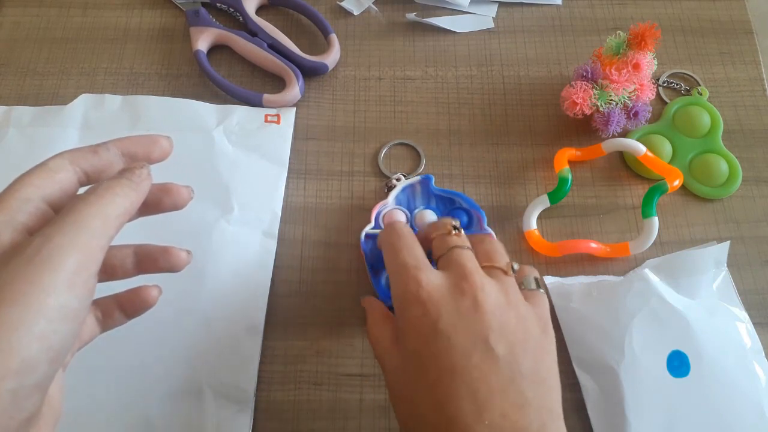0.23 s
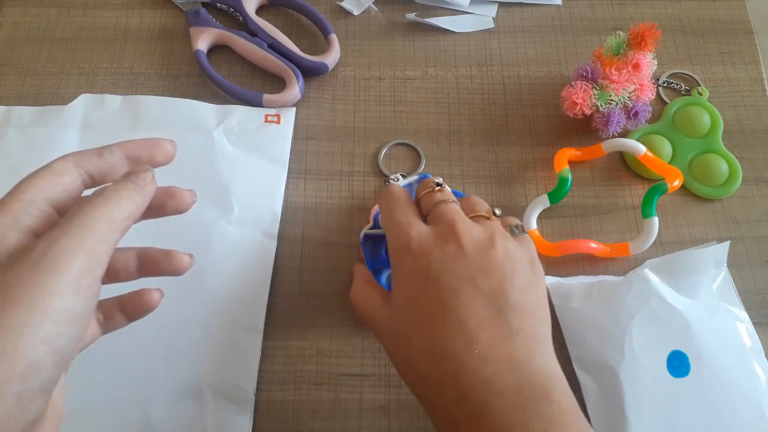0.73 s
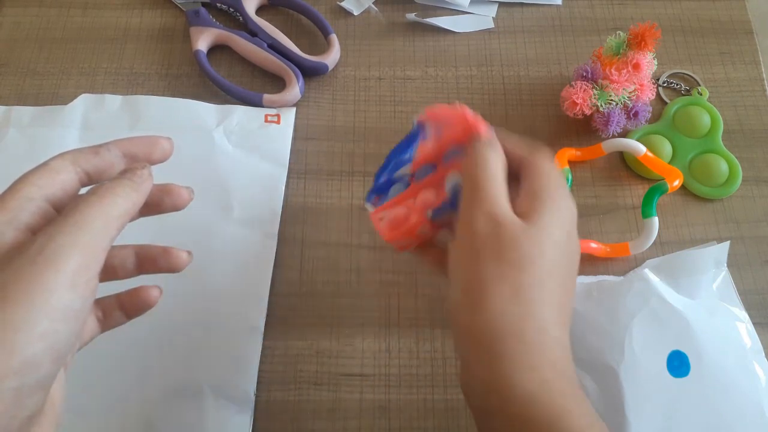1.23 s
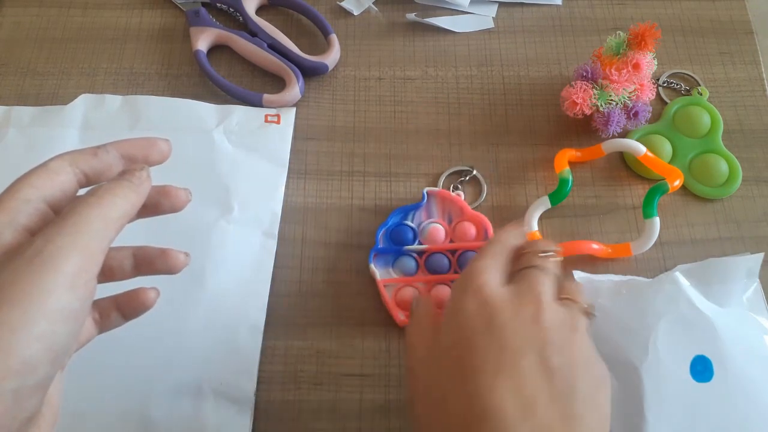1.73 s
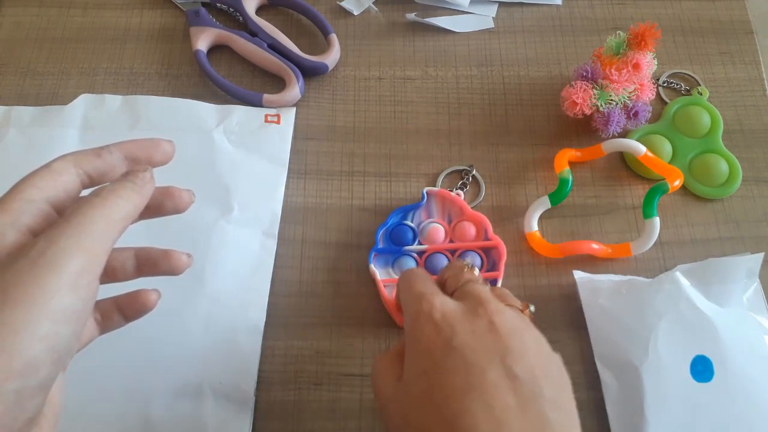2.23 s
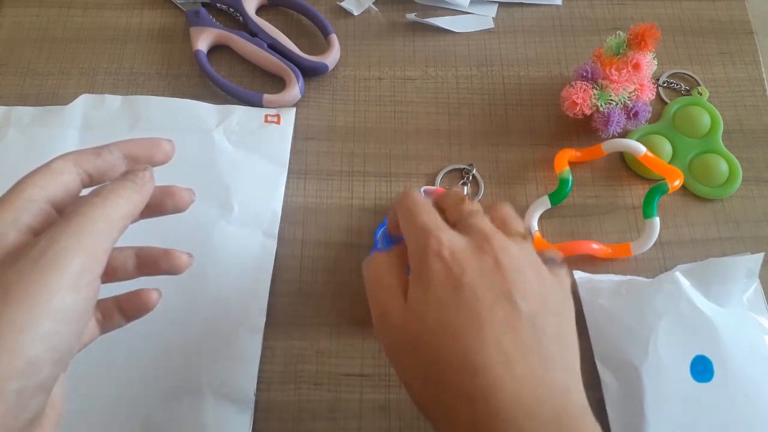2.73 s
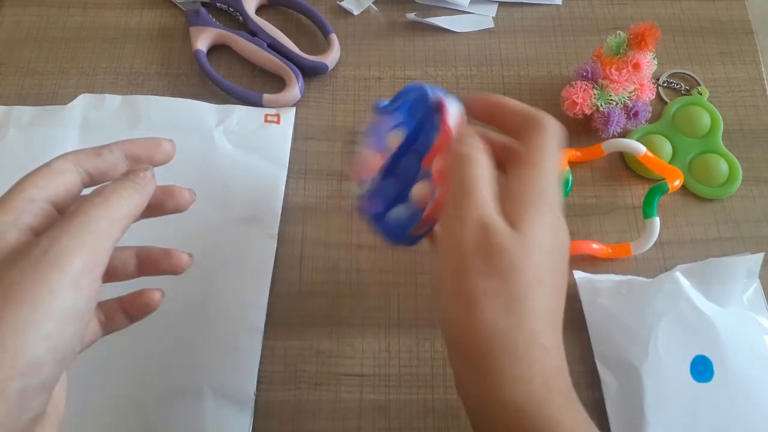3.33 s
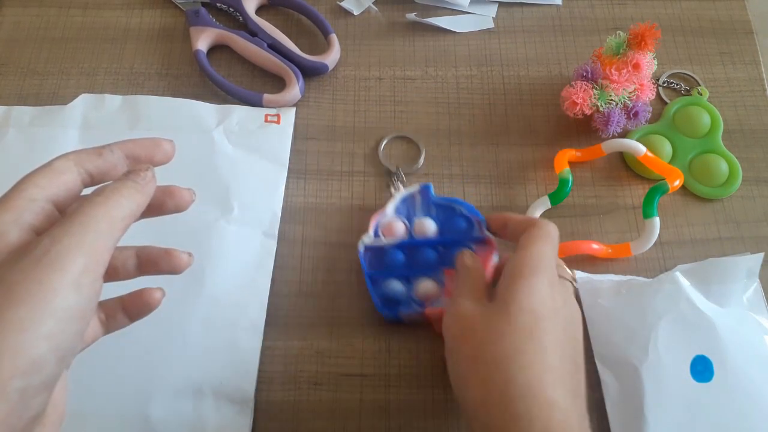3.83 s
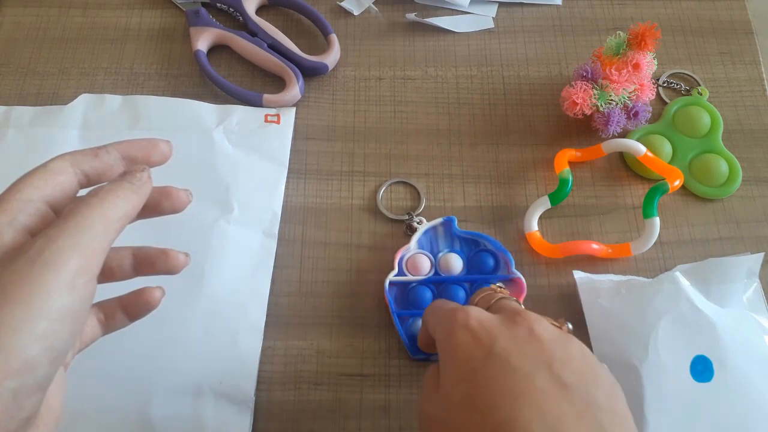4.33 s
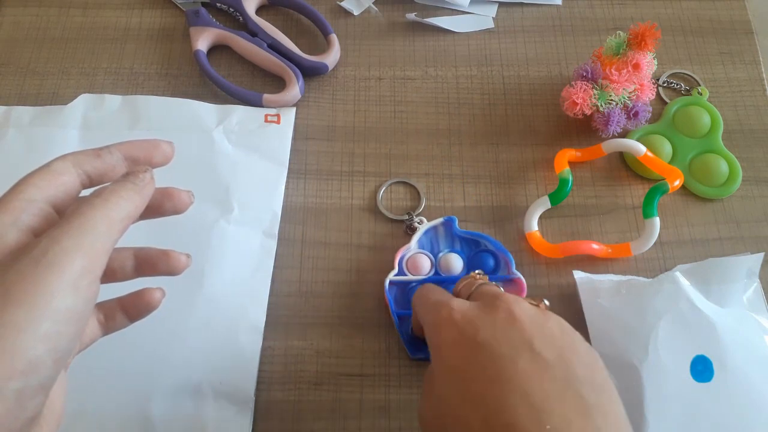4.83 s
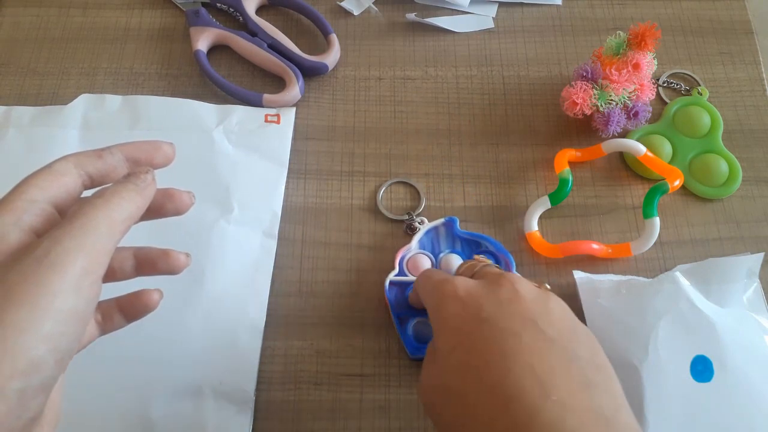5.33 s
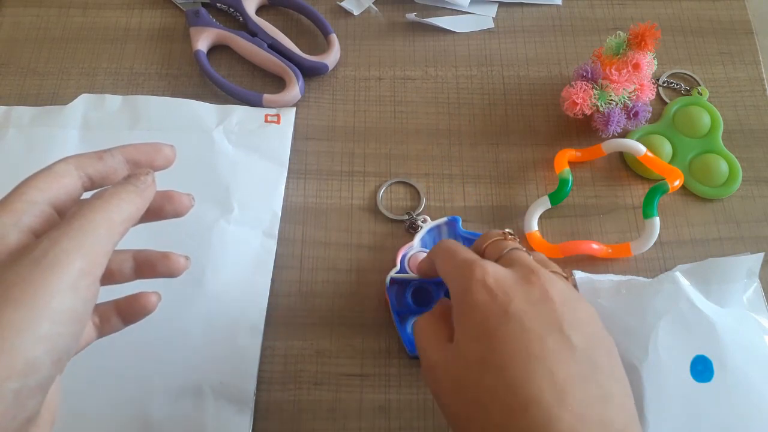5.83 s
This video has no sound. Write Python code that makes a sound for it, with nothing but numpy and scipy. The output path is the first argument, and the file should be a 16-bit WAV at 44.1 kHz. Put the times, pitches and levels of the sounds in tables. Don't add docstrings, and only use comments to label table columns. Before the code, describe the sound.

Close, punchy rubbery pops, metallic key-ring clatter as the toy is turned over, then a dragging rub with a brief squeak and more pops.

```python
import sys
import numpy as np
from scipy import signal
from scipy.fft import rfft, irfft
from scipy.io import wavfile

SR = 44100
rng = np.random.default_rng(int(sys.argv[2]) if len(sys.argv) > 2 else 0)


def file_out(sig):
    cols = np.atleast_2d(sig).T
    lim = np.clip(cols, -1, 1)
    pcm = np.round(lim * 32767).astype(np.int16)
    wavfile.write(sys.argv[1], SR, pcm)


def linear_from_db(decibels):
    return 10 ** (np.asarray(decibels, float) / 20)


N = 267775


def rms_one(x):
    return x / np.sqrt(np.mean(x ** 2) + 1e-20)


def peak_one(x):
    return x / (np.abs(x).max() + 1e-20)


def band(x, low_hz, high_hz):
    limits = [low_hz, min(high_hz, .45 * SR)]
    return signal.sosfilt(signal.butter(2, limits, "band", fs=SR, output="sos"), x)


def coloured(spectrum, size):
    hz, level_db = np.transpose(spectrum)
    bins = np.maximum(np.arange(size // 2 + 1) * SR / size, 1)
    gain = linear_from_db(np.interp(np.log(bins), np.log(hz), level_db))
    return rms_one(irfft(rfft(rng.standard_normal(size)) * gain, size))


def modes(clicks, table):
    out = 0
    for hz, level_db, t60 in table:
        r = linear_from_db(-60 / (t60 * SR))
        w = 2 * np.pi * hz / SR
        gain = linear_from_db(level_db) * np.sin(w)
        out = out + signal.lfilter([0, gain], [1, -2 * r * np.cos(w), r * r], clicks + 1e-18)
    return out


def burst(size, length):
    t = np.arange(size) / SR
    rise = np.minimum(t / max(.4 * length - .001, .0003), 1)
    return rise * np.exp(-(t / max(length, .0003)) ** 1.25)


def add(track, s, sound):
    i = round(s * SR)
    track[i:i + len(sound)] += sound[:N - i]


def pop_rows():
    # start in seconds, peak in dB, air cavity pitch in Hz,
    # rim crack in dB, ring length in cycles.
    snaps = [(0.692, -10.5, 598, -41.5, 1.17), (2.2995, -10.5, 895, -39.5, 2.4),
             (2.313, 8.5, 1320, -10.5, 1.36), (2.319, 7, 1126, -16.5, 1.8), (2.336, 3.5, 930, -10, 2.13),
             (2.61, 0.5, 937, -13.5, 1.27), (2.632, 0.5, 767, -12.5, 1.54), (2.638, 0.5, 1080, -10, 1.3),
             (2.881, 1, 1210, -26, 1.33), (2.889, 0.5, 2100, -16, 1.9), (2.909, -5, 1250, -13.5, 1.05),
             (4.115, -13.5, 1260, -22, 1.95), (4.116, -5, 910, -24, 1.4), (4.792, -6.5, 1000, -58, 1.22),
             (5.588, -5, 1944, -15, 1.34), (5.832, -3.5, 1443, -48, 2.28)]
    # start in seconds, peak in dB, air cavity pitch in Hz.
    ticks = [(0.232, -40.5, 2340), (0.294, -37, 4000), (0.534, -36.5, 1330), (0.65, -26, 750),
             (1.0, -27.5, 1880), (1.017, -36.5, 1850), (1.573, -20.5, 1500), (1.728, -22, 994),
             (1.955, -34, 1373), (2.015, -39, 1087), (2.6, -21, 803), (2.847, -27, 1510),
             (2.855, -23, 1130), (3.145, -20.5, 1510), (4.389, -44, 1020), (4.414, -37, 1150),
             (4.809, -14, 1015), (5.15, -18.5, 1550), (5.214, -27, 1300), (5.253, -38, 675),
             (5.773, -24, 1333), (5.782, -27, 1470), (5.903, -21.5, 1500), (6.001, -35.5, 1287)]
    crack_under_peak_db, cycles = -25, 1.3
    return sorted(snaps + [(s, db, hz, db + crack_under_peak_db, cycles) for s, db, hz in ticks])


def pops():
    crack_hz = 6350
    rows, out, t = pop_rows(), np.zeros(N), np.arange(600) / SR
    grit = rng.standard_normal((len(rows), 600))
    for (s, peak_db, hz, crack_db, cycles), noise in zip(rows, grit):
        turns = t * hz
        overtone_db = -1 - 13 * np.log2(hz / 1000) + 0.37 * (crack_db - peak_db)
        swell = turns ** 0.89 * np.exp(-(turns / cycles) ** 2)
        overtone = linear_from_db(overtone_db) * np.sin(2 * np.pi * 2.05 * turns)
        cavity = swell * (np.sin(2 * np.pi * turns) + overtone)
        click = (1 + .5 * noise) * burst(600, .0003) * np.cos(2 * np.pi * crack_hz * t)
        crack = band(click + .2 * noise * burst(600, .002), 2800, 11000)
        add(out, s + .0005, linear_from_db(peak_db - 2.0) * peak_one(cavity))
        add(out, s + 0.00064, linear_from_db(crack_db + 1.25) * peak_one(crack))
    return out


def squelches():
    # start in seconds, peak in dB, centre in Hz, length in seconds.
    squashed = [(0.439, -25.5, 810, 0.012), (0.446, -30, 1680, 0.018), (0.45, -44, 450, 0.022),
                (2.577, -16, 1490, 0.022), (2.582, -31, 980, 0.0081), (2.771, -24, 1380, 0.015),
                (2.849, -29, 1044, 0.017), (2.872, -18.5, 1978, 0.03), (3.107, -26, 864, 0.015),
                (3.208, -42.5, 664, 0.0071), (3.315, -34.5, 1620, 0.025), (3.46, -26, 754, 0.056),
                (4.117, -19, 606, 0.0098), (4.291, -33.5, 830, 0.018), (4.65, -43, 1350, 0.014),
                (4.997, -55, 1404, 0.015), (5.144, -28.5, 1602, 0.017), (5.153, -30.5, 447, 0.013),
                (5.602, -28.5, 1786, 0.031), (5.899, -36.5, 1565, 0.017)]
    width = 1.98
    out, grit = np.zeros(N), rng.standard_normal((len(squashed), 2, 8000))
    for (s, peak_db, hz, length), (noise, size) in zip(squashed, grit):
        slips = noise * linear_from_db(5.0 * size) * burst(8000, length)
        creases = band(slips, hz / width, hz * width)
        creases = band(creases, hz / width ** 2, hz * width ** 0.43)
        add(out, s, linear_from_db(peak_db) * peak_one(creases))
    return out


def landings():
    # start in seconds, peak in dB, centre in Hz, slap of the toy in dB.
    first_flip = [(1.0829, -40, 4900, -57.5), (1.1009, -28.5, 7000, -39.5), (1.1209, -27.5, 5070, -35.5),
                  (1.1286, -30.5, 2800, -51.5), (1.285, -5, 3250, -5.5), (1.3074, -18.5, 2700, -12),
                  (1.3641, 4, 5410, -3.5), (1.4134, -15, 5000, -11.5), (1.4252, -4, 4830, -7.5),
                  (1.5103, -26.5, 3180, -55), (1.6192, -42, 3550, -61), (1.6542, -24.5, 5476, -57),
                  (1.6601, -19, 5930, -23.5), (1.7424, -21.5, 3560, -22), (1.7639, -11, 5970, -9.5),
                  (1.7749, -10.5, 5910, -14), (1.7843, -13.5, 3420, -19.5)]
    # start in seconds, peak in dB, centre in Hz, slap of the toy in dB.
    second_flip = [(3.1076, -37.5, 5210, -40), (3.1204, -31.5, 3760, -26.5), (3.2615, -41, 3700, -43),
                   (3.2765, -46, 8160, -42), (3.2959, -34.5, 7600, -38.5), (3.3992, -17, 5460, -13.5),
                   (3.4391, -27, 8100, -20.5), (3.475, -24, 2360, -27), (3.484, -6, 3730, -8.5),
                   (3.5047, -9, 3470, -30), (3.5196, -7.5, 4870, -14), (3.5527, -7, 3280, -9.5),
                   (3.566, -15, 3230, -29), (3.5867, -24.5, 3100, -39)]
    # start in seconds, peak in dB, slap of the toy in dB.
    skips = [(3.6346, -18, -46), (3.6535, -13, -21), (3.6755, -25, -52.5), (3.6879, -15, -14.5),
             (3.695, -10, -21), (3.7286, -34, -49), (3.7549, -14, -20), (3.8074, -20, -61),
             (3.8571, -21.5, -41), (3.901, -15, -24), (3.9499, -23.5, -16), (3.9878, -22, -61),
             (3.9998, -31, -19), (4.0307, -18, -56), (4.0657, -25, -33), (4.1054, -19.5, -14.5),
             (4.1125, -46, -15), (4.1414, -16, -26), (4.151, -29, -27), (4.1698, -17.5, -20),
             (4.1834, -25.5, -24.5), (4.7212, -48.5, -63), (4.7992, -37, -33), (4.8063, -31, -29),
             (5.8214, -34.5, -34)]
    skip_hz = 3700
    top_per_db = 1.84
    flips = [(*row, top_per_db * row[1] - 26.5) for row in first_flip + second_flip]
    return flips + [(s, db, skip_hz, slap_db, top_per_db * db - 24) for s, db, slap_db in skips]


def clatter():
    # pitch in Hz, level in dB, time to die away in seconds.
    key_ring = [(8030, -8, .11), (8160, -11, .07), (7900, -13, .06)]
    # start in seconds, peak in dB.
    ring_hits = [
        (1.0992, -42.5),
        (1.2883, -27.5),
        (1.3105, -38),
        (3.2759, -43),
        (3.2959, -37),
        (3.401, -39.5),
        (3.4082, -29.5),
    ]
    spray_s, top_turned_db = .006, 9
    rows, out, hits = landings(), np.zeros(N), np.zeros(N)
    grit = rng.standard_normal((len(rows), 2, 2000))
    for (s, peak_db, hz, slap_db, top_db), (noise, size) in zip(rows, grit):
        spray = noise * linear_from_db(2.5 * size) * burst(2000, spray_s)
        links = 0.75 * peak_one(band(spray, hz / 1.7, hz * 1.276))
        links = links + 0.48 * peak_one(band(spray, 2500, 7300))
        slap = peak_one(band(band(spray, 500, 5000), 800, 3200))
        top = peak_one(band(spray, 10000, 16000))
        landing = linear_from_db(peak_db) * peak_one(links) + linear_from_db(slap_db) * slap
        add(out, s, landing - linear_from_db(top_db + top_turned_db) * top)
    for s, peak_db in ring_hits:
        add(hits, s, linear_from_db([peak_db]))
    return out + modes(hits, key_ring)


def slide():
    # pitch in Hz, level in dB per Hz.
    slide_colour = [(300, -22), (550, -18), (800, 8.5), (1150, -2), (1700, 8.5), (3000, 5), (5000, -6.5),
                    (8500, -20), (10000, -28), (15000, -19)]
    # start in seconds, attack in seconds, hold in seconds, level in dB,
    # release in dB per second.
    strokes = [
        (1.079, 0.051, 0.0014, -40.5, 249),
        (1.29, 0.073, 0.55, -53, 112),
        (1.687, 0.11, .002, -42, 263),
        (3.132, 0.026, .2, -53, 300.5),
        (3.393, 0.057, 0.59, -35.5, 71.5),
    ]
    t, gain, bright = np.arange(N) / SR, np.zeros(N), np.zeros(N)
    for s, attack, hold, level_db, release in strokes:
        rising = np.clip(1 - (t - s) / attack, 0, 1)
        fall_db = release * np.maximum(t - s - attack - hold, 0)
        stroke = (t > s) * linear_from_db(level_db - 13 * rising - fall_db)
        gain += stroke
        bright += stroke * linear_from_db(-3 + 9.5 * rising)
    clumps = linear_from_db(4.2 * rms_one(band(rng.standard_normal(N), 25, 330)))
    noise = coloured(slide_colour, N) * clumps
    dull_rub = gain * rms_one(band(noise, 400, 3000))
    bright_rub = bright * rms_one(band(noise, 2400, 18000))
    return linear_from_db(-0.5) * (dull_rub + bright_rub)


def squeak():
    # time in seconds, pitch in Hz, level in dB.
    squeak_path = [
        (3.895, 454, -65),
        (3.909, 456, -51),
        (3.919, 498, -36.5),
        (3.991, 515, -40),
        (4.009, 486, -33.5),
        (4.021, 493, -44),
        (4.035, 456, -53),
        (4.045, 443, -51),
    ]
    # multiple of the pitch, level in dB.
    harmonics = [(1, -1.5), (2, 3), (3, -2), (4, -9.5), (5, -4), (6, -6.5)]
    t, (s, hz, level_db) = np.arange(N) / SR, np.transpose(squeak_path)
    wobble = rms_one(band(rng.standard_normal(N), 10, 50))
    phase = 2 * np.pi * np.cumsum(np.interp(t, s, hz) * (1 + 0.006 * wobble)) / SR
    tone = sum(linear_from_db(order_db) * np.sin(round(k) * phase) for k, order_db in harmonics)
    return tone * linear_from_db(np.interp(t, s, level_db, -120, -120) + 5.9 * wobble)


def thumps():
    # start in seconds, peak in dB, contact in seconds.
    desk_landings = [(0.442, -37, 0.005), (0.697, -26, 0.0054), (1.287, -19.5, 0.00089),
                     (1.367, -15.5, 0.0012), (1.431, -19, 0.00097), (1.62, -42, 0.0041),
                     (1.769, -21.5, 0.0029), (2.313, -31, 0.0045), (2.591, -23, 0.0044),
                     (2.615, -21.5, 0.009), (2.639, -58, 0.0072), (2.771, -32, 0.0021),
                     (2.887, -16.5, 0.0032), (3.108, -25, 0.0033), (3.456, -22.5, 0.0019),
                     (3.489, -23, 0.0019), (3.553, -27.5, 0.0032), (4.114, -28.5, 0.0051),
                     (4.277, -39.5, 0.0021), (4.795, -24, 0.0041), (4.806, -20.5, 0.0068),
                     (5.154, -35.5, 0.0067), (5.592, -22.5, 0.00075), (5.906, -34, 0.0013)]
    # pitch in Hz, level in dB, time to die away in seconds.
    desk = [(97.2, -5, .09), (140, 7, 0.048), (204, 5.5, 0.066), (247, 4.5, 0.026), (420, -0.5, 0.056)]
    push = np.zeros(N)
    for s, peak_db, contact in desk_landings:
        phase = np.arange(0, 1, 1 / (np.clip(contact, .001, .02) * SR))
        shape = np.sin(2 * np.pi * phase) * np.sin(np.pi * phase)
        add(push, s, linear_from_db(peak_db) * shape / len(phase))
    return modes(push, desk)


def settling():
    start_s, hold_s, level_db, fall_db_per_s = 4.2, .23, -56, 95
    cavity_hz, grain_depth_db = 1096, 3
    noise, since = rng.standard_normal(N), np.arange(N) / SR - start_s
    hum = rms_one(band(noise, cavity_hz / 1.13, cavity_hz * 1.13))
    grain_db = grain_depth_db * rms_one(band(noise, 20, 78))
    fall_db = fall_db_per_s * np.maximum(since - hold_s, 0)
    return hum * (since > 0) * linear_from_db(level_db - fall_db + grain_db)


def fading_pop():
    # pitch in Hz, level in dB, time to die away in seconds.
    old_pop = (680, -42.5, 0.22)
    hz, level_db, t60 = old_pop
    tail = rms_one(band(rng.standard_normal(N), hz / 0.98, hz * 1.77))
    return tail * linear_from_db(level_db - 60 * np.arange(N) / SR / t60)


def room(x):
    # pitch in Hz, time to die away in seconds, level in dB.
    room_decay = [(80, 0.12, -21.5), (250, .28, -4.5), (616, .25, -15.5), (1500, 0.3, -17.5),
                  (4000, 0.3, -18.5), (7950, 0.28, -20.5), (13900, 0.2, -15)]
    # delay in seconds, level in dB.
    echoes = [
        (.0115, -22),
        (.0205, -24),
    ]
    t, edges = np.arange(SR // 2) / SR, 50 * 2 ** np.arange(0, 8.6, .5)
    hz, t60, level_db = np.transpose(room_decay)
    white, response = rng.standard_normal((3, len(t))), 0
    for k, (low, high) in enumerate(zip(edges, edges[1:])):
        at = np.log(low * high) / 2
        start_db = np.interp(at, np.log(hz), level_db)
        decay = linear_from_db(start_db - 60 * t / np.interp(at, np.log(hz), t60))
        response = response + band(white[k % 2], low, high) * decay
    sparse = linear_from_db(9.0 * white[2].repeat(40)[:len(t)] * np.exp(-t / 0.01))
    response = response * sparse * np.clip((t - .003) / .012, 0, 1) / 8
    for s, echo_db in echoes:
        add(response, s, linear_from_db(echo_db) * np.hanning(9) / 4)
    return signal.fftconvolve(x, response)[:N]


def microphone(x):
    knee_hz, top_db = 9600, -9
    high = np.tile(signal.butter(5, knee_hz, "high", fs=SR, output="sos"), (2, 1))
    low = np.tile(signal.butter(5, knee_hz, "low", fs=SR, output="sos"), (2, 1))
    heard = signal.sosfilt(low, x) - linear_from_db(top_db) * signal.sosfilt(high, x)
    return band(band(heard, 60, 19000), 70, 17000)


def quiet_floor():
    # pitch in Hz, level in dB per Hz.
    floor_colour = [(12, -54), (20, -25), (81, 3.5), (113, 3), (357, -12), (1120, -17), (1260, -17.5),
                    (1860, -19), (9400, -22), (13900, -21), (16000, -27.5)]
    return linear_from_db(-61) * coloured(floor_colour, N)


def side_hiss():
    # pitch in Hz, level in dB per Hz.
    hiss_colour = [(12, -27.5), (20, -1), (146, -14.5), (698, -16.5), (949, -30), (3250, -19),
                   (4420, -16.5), (12800, -18.5), (16000, -15.5)]
    return linear_from_db(-63.5) * coloured(hiss_colour, N)


def scene():
    domes = pops() + squelches() + thumps()
    handling = clatter() + slide() + squeak() + settling()
    wet = room(linear_from_db(-1.0) * domes + linear_from_db(3.0) * handling)
    close = microphone(domes + handling + wet + fading_pop())
    side = side_hiss() + linear_from_db(-27.5) * band(wet, 1500, 16000) + linear_from_db(-28) * band(close, 9000, 16000)
    mid = close + quiet_floor()
    return np.array([mid + side, mid - side])


def roll_off(x):
    return signal.sosfilt(signal.butter(12, 16440, fs=SR, output="sos"), x)


def record(dry):
    return roll_off(np.clip(dry, -1, 1))


dry = scene()
out = record(dry)
file_out(out)
```